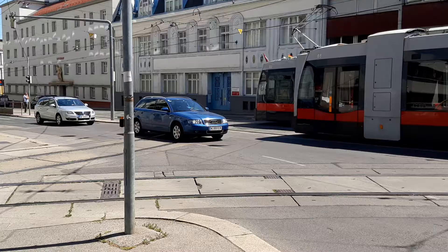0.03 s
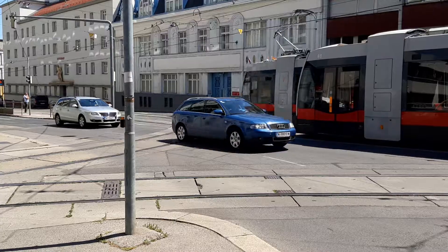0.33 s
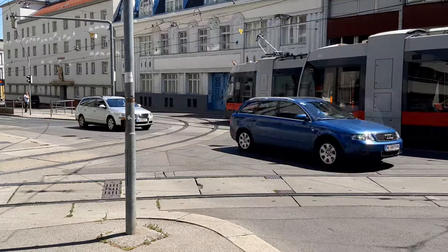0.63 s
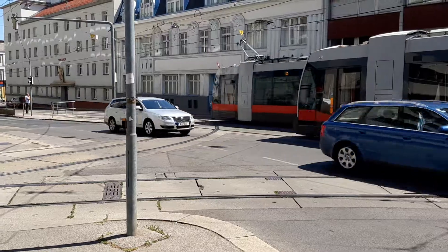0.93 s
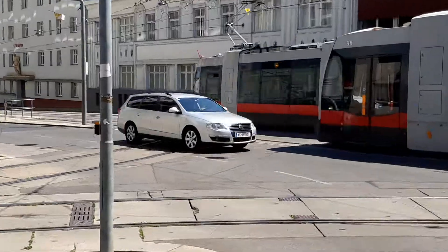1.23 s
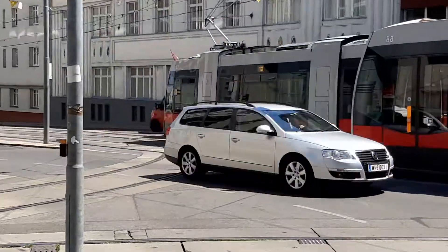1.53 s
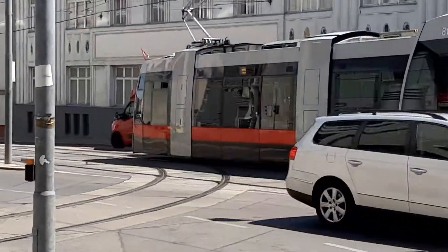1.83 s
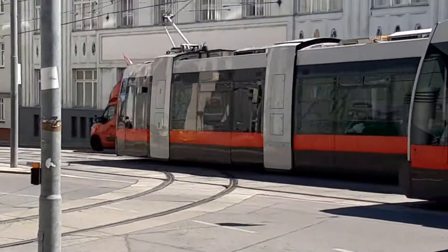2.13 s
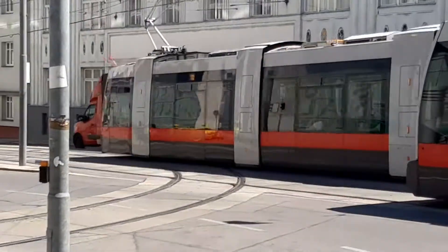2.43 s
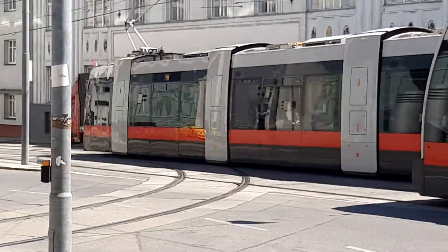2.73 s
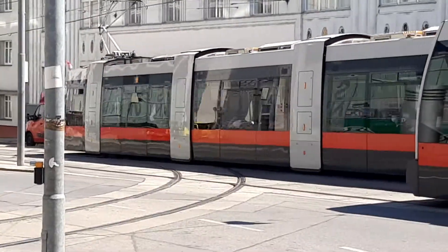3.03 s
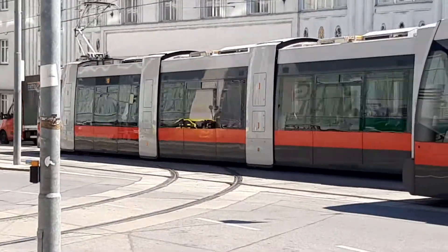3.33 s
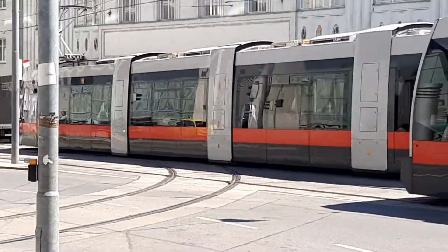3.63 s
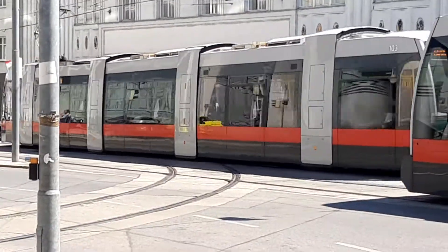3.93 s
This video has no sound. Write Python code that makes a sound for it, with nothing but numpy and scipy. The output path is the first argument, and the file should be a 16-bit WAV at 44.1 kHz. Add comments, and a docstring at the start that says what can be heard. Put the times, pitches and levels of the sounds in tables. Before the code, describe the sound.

A tram rolls through a curve at a city junction, its wheels ringing, knocking and thinly squealing. Two cars pass left to right early on, then the tram's electric whine swells and a short hiss follows, over low rumble.

```python
"""A tram rolls through a curve at a city junction: its steel wheels ring and knock over rail joints,
its electric drive whines and its flanges squeal thinly against the rail. Two cars pull past it,
left to right, engines humming, tyres roaring and slapping over the rail grooves. A short hiss spurts
near the end. House fronts scatter it all, over a wash of traffic, around two microphones a hand apart.
Underneath throbs a low rumble, probably wind buffeting the microphones."""
import sys
import numpy as np
from scipy import signal
from scipy.fft import rfft, irfft
from scipy.io import wavfile
from scipy.ndimage import uniform_filter1d, map_coordinates

SR = 44100
rng = np.random.default_rng(int(sys.argv[2]) if len(sys.argv) > 2 else 0)


def inscribe(sig):
    """Save sig as 16-bit PCM at rate SR to the path in sys.argv[1].

    A 1-D sig is mono; a 2-D sig holds one channel per row.
    Samples are clipped to [-1, 1] before scaling.
    """
    pcm = np.round(np.clip(np.atleast_2d(sig).T, -1, 1) * 32767)
    wavfile.write(sys.argv[1], SR, pcm.astype(np.int16))


N = 176400
MIC_SPACING_S = 0.00052  # sound's travel time between the microphones


def tram_wheels(bearing=0.76, rattle_db=1.0):
    """Steel wheels roll on the rail and set both ringing."""
    # rolling noise: freq_hz, gain_db
    rolling_spectrum = [(25, -30), (70, -0.5), (170, 5.5), (290, 2.5), (480, -2.5), (950, -3.5), (1250, -5),
                        (1600, -1.5), (2100, -7.5), (2800, -12.5), (3800, -13.5), (4600, -22), (7600, -29),
                        (8500, -43), (12000, -64), (15500, -50)]
    # its envelope: time_s, level_db
    rolling_level = [(.1, -30), (1.3, -31), (1.7, -28), (2.05, -27), (2.6, -30), (3.15, -29.5), (3.5, -31),
                     (4, -31.5)]
    # ring of wheels and rail: pitch_hz, width_hz, start_db, slope_db_per_s
    wheel_modes = [(1525, 43, -37.5, -4), (2050, 45, -41, -2.5), (2660, 210, -50.5, 1.1),
                   (3110, 140, -46.5, -4.5)]
    rolling = outdoors(colour(rolling_spectrum), bearing, echo_db=5.5)
    rolling *= undb(curve(rolling_level) + rattle_db * walk(35.25))
    ring = 0
    for hz, width, db, slope in wheel_modes:
        mode = outdoors(resonance(hz, width), bearing, echo_db=16.0)
        ring += mode * undb(db + slope * clock() + 0.66 * walk(12))
    return rolling + lean_right(ring, db=6)


def joint_knocks():
    """Tram wheels knock over rail joints: a dull thud, a clank and a longer ring of steel."""
    # wheel hits: start_s, thud_db, clank_db, ring_db
    hits = [(1.972, -23, -27, -34), (2.055, -24, -29, -37), (2.125, -23.5, -32, -29), (2.21, -26, -46, -50),
            (2.255, -26, -46, -50)]
    # low thud: freq_hz, gain_db
    thud_spectrum = [(25, -40), (50, -16), (110, 0), (180, -6), (350, -18), (1000, -19), (2500, -71)]
    # bright clank: freq_hz, gain_db
    clank_spectrum = [(200, -26), (700, 4.5), (2700, 0.5), (4000, -8), (7500, -12), (9000, -29),
                      (15000, -27)]
    # ring of a struck wheel: pitch_hz, gain_db
    steel_modes = [(1550, 1), (2040, 2), (2680, 2), (3830, -7), (4010, -10)]
    attack_s, knock_decay_s, ring_decay_s = 0.0066, 0.027, 0.045
    steel = sum(undb(db) * resonance(hz, width_hz=35) for hz, db in steel_modes)
    thud = outdoors(colour(thud_spectrum), bearing=0.56, echo_db=-8)
    clank = diffuse(colour(clank_spectrum))
    ring = diffuse(steel)
    out = 0
    for start, thud_db, clank_db, ring_db in hits:
        out += (thud * undb(thud_db) + clank * undb(clank_db)) * strike(start, attack_s, knock_decay_s)
        out += ring * undb(ring_db) * strike(start, attack_s, ring_decay_s)
    return out


def flange_squeals(edge_s=.08, scrape_depth=.8, stutter_db=2):
    """Wheel flanges rub the curved rail: a thin hiss with unsteady, very high squeals on top."""
    # envelope of the rub: time_s, level_db
    rub_level = [(.1, -60), (1.5, -64), (2.05, -54.5), (3.0, -61.5), (4, -62)]
    # squeals: start_s, length_s, pitch_hz, glide_hz, level_db, wander_hz
    squeals = [(.22, .32, 15100, -200, -60, 400), (1.6, .34, 11130, 200, -59, 40),
               (1.86, .4, 11130, 250, -57.5, 40), (2.26, .68, 11830, -70, -62, 45),
               (2.5, .23, 11810, -20, -54, 50), (3.06, 1.2, 11790, 0, -62.5, 35)]
    out = diffuse(resonance(hz=11740, width_hz=510)) * undb(curve(rub_level))
    for start, length, hz, glide, db, wander in squeals:
        age = clock() - start
        gate = np.clip(np.minimum(age, length - age) / min(edge_s, length / 2), 0, 1)
        pitch = hz + glide * np.clip(age / length, 0, 1) + wander * walk(200)
        squeal = np.array([tone(pitch) * (0.67 + scrape_depth * walk(350)) for _ in range(2)])
        out += squeal * gate * undb(db + stutter_db * walk(30.2))
    return out


def curve_strain(bearing=0.55, echo_db=8):
    """Strain in the curve makes resonances of the tram's wheels and body swell and die away."""
    # resonances, the wide ones scrapes: peak_s, spread_s, pitch_hz, width_hz, level_db
    modes = [(.2, .12, 156, 6, -30), (.22, .16, 4600, 70, -51), (.3, .13, 3780, 70, -42),
             (.62, .18, 3240, 180, -42), (1.335, .018, 3600, 1600, -40), (2.72, .12, 177, 6, -31)]
    return sum(outdoors(resonance(hz, width), bearing, echo_db) * undb(db) * swell(peak, spread)
               for peak, spread, hz, width, db in modes)


def drive_whine(waver_hz=2.43, fading_db=5.0):
    """The electric drive swells under load; echoes fade each partial separately at each microphone."""
    # whine partials: pitch_hz, level_db, load_change_db
    partials = [(1130, -53, 0), (1362.6, -53, -3), (1399, -54, 6.5), (1437.6, -58, 5), (1514.4, -51.5, 4),
                (2632, -61, 7), (2708, -62, 7)]
    load = swell(peak_s=3.3, spread_s=.3)
    out = 0
    for hz, db, load_change in partials:
        partial = place(tone(hz + waver_hz * walk(15)), bearing=0.31)
        fading = fading_db * np.array([walk(5.5), walk(5.83)])
        out += partial * undb(db + load_change * load + fading)
    return out


def car_engines(jitter=0.0039, flutter_db=2):
    """One car's exhaust boom and overtones climb as it speeds up; the other car drones."""
    # accelerating engine: time_s, firing_hz
    revs = [(.1, 75.7), (.45, 78.02), (1.1, 82.4), (2.9, 89.5)]
    # its envelopes: time_s, boom_db, overtones_db
    levels = [(.1, -27, -29.5), (.35, -21, -33), (.52, -21, -38), (.75, -34, -31.5), (1.12, -25.5, -29.5),
              (1.3, -34, -29.5), (1.5, -28.5, -39.5), (2.1, -31, -44.5), (2.8, -36, -40), (3.1, -29, -63)]
    # its overtones: firing_multiple, gain_db
    harmonics = [(2, -2.5), (3, -3.5)]
    # the other car's drone: time_s, pitch_hz, level_db
    drone_path = [(.1, 209, -36.5), (.5, 216, -34.5), (1.3, 215.6, -32.5), (1.7, 214, -34.5),
                  (2.1, 209, -66)]
    firing_hz = curve(revs) * (1 + jitter * walk(13.55))
    boom = tone(firing_hz) * undb(curve(levels) + 0.13 * walk(14.0))
    overtones = sum(tone(k * firing_hz) * undb(db + flutter_db * walk(11.2)) for k, db in harmonics)
    overtones *= undb(curve(levels, column=2))
    drone = tone(curve(drone_path) * (1 + 0.0081 * walk(22)))
    drone *= undb(curve(drone_path, column=2) + flutter_db * walk(11.0))
    left_to_right = np.tanh(0.73 * (clock() - .5))
    return place(boom + overtones + drone, left_to_right)


def car_passes(grain_db=1.2, right_offset_m=2.7):
    """Each car's tyre roar and body rumble sweep left to right and swell with nearness."""
    # cars at their closest: time_s, speed_m_per_s, distance_m, tyre_db, body_db
    cars = [(1.24, 7.3, 4.05, -30.5, -31), (2.0, 7.2, 2.73, -38.5, -27)]
    # tyre roar: freq_hz, gain_db
    tyre_spectrum = [(25, -26), (120, -3), (260, -0.5), (480, -12.5), (700, -6), (980, -1.5), (1300, -18.5),
                     (2000, -12.5), (3500, -28.5), (7500, -28.5), (8600, -43.5), (15000, -54)]
    # car body rumble: freq_hz, gain_db
    body_spectrum = [(30, -33), (80, -5.5), (130, -1.5), (180, -4.5), (300, -25.5), (900, -55.5)]
    out = 0
    for closest_s, speed, distance, tyre_db, body_db in cars:
        along = speed * (clock() - closest_s)
        across = along + right_offset_m  # the road comes closest right of centre
        bearing = across / np.hypot(across, distance)
        roar = outdoors(colour(tyre_spectrum), bearing, echo_db=-0.5)
        roar *= undb(tyre_db + grain_db * walk(70))
        body = outdoors(colour(body_spectrum), bearing, echo_db=-3.0) * undb(body_db)
        out += (roar + body) * distance / np.hypot(along, distance)
    return out


def tyre_slaps(bearing=0.74, attack_s=.001):
    """Car tyres slap over the rail grooves: short hollow tocks."""
    # slaps: start_s, pitch_hz, decay_s, level_db
    slaps = [(1.293, 800, .005, -16), (2.357, 1010, .012, -27)]
    tocks = sum(tone(np.full(N, hz)) * undb(db) * strike(start, attack_s, decay)
                for start, hz, decay, db in slaps)
    return place(tocks, bearing)


def hiss_spurt(level_db=-33.5):
    """A short, bright hiss, like an air valve."""
    # hiss: freq_hz, gain_db
    spectrum = [(300, -20), (800, 20), (3000, 8), (7500, 2), (8600, -13), (11500, 2), (13000, -14)]
    return diffuse(colour(spectrum)) * undb(level_db) * strike(3.835, attack_s=.012, decay_s=.08)


def low_rumble(throb_db=1.15):
    """A low, throbbing rumble, probably wind buffeting the microphones."""
    # low rumble: freq_hz, gain_db
    spectrum = [(20, -38), (32, -29), (48, 1), (60, 1.5), (74, 2.5), (92, -1.5), (125, -7.5), (190, -9),
                (320, -15), (700, -61)]
    # its envelope: time_s, level_db
    level = [(.1, -32), (1.45, -28.5), (2.0, -28.5), (2.14, -23), (2.29, -22.5), (2.45, -28), (2.8, -29.5),
             (2.9, -25), (3.25, -25), (3.42, -30.5), (3.78, -29), (3.89, -21.5), (4, -24)]
    rumble = outdoors(colour(spectrum), bearing=0.76, echo_db=4.5)
    return rumble * undb(curve(level) + throb_db * walk(24.99))


def street_wash():
    """A bed of traffic noise echoes between the house fronts."""
    # traffic bed: freq_hz, gain_db
    spectrum = [(25, -28), (100, -23), (250, 5.5), (480, -7), (750, -0.5), (1250, -12), (2000, -14.5),
                (3300, -13.5), (5000, -23), (7600, -24), (8500, -37.5), (12000, -29.5), (15500, -35.5)]
    # its envelope: time_s, level_db
    level = [(.1, -28.5), (.6, -31), (1.3, -30.5), (2.1, -41.5), (2.5, -43.5), (3.55, -47), (3.8, -38),
             (4, -35.5)]
    return outdoors(colour(spectrum), bearing=0.086, echo_db=7.5) * undb(curve(level) + .5 * walk(20))


def undb(db):
    """Decibels to gain."""
    return 10 ** (np.asarray(db) / 20)


def clock():
    """Time of every sample in seconds."""
    return np.arange(N) / SR


def curve(table, column=1):
    """One column of a table, joined by straight lines in time."""
    rows = np.array(table)
    return np.interp(clock(), rows[:, 0], rows[:, column])


def strike(start_s, attack_s, decay_s):
    """Envelope of a hit: quick rise, exponential decay."""
    age = np.maximum(clock() - start_s, 0)
    return np.minimum(age / attack_s, 1) * np.exp(-age / decay_s)


def swell(peak_s, spread_s):
    """A bell-shaped rise and fall."""
    return np.exp(-.5 * ((clock() - peak_s) / spread_s) ** 2)


def walk(rate_hz):
    """Smooth random motion with a spread near 1."""
    hold = max(int(SR / rate_hz), 2)
    steps = np.repeat(rng.standard_normal(N // hold + 2), hold)
    return 1.3 * uniform_filter1d(uniform_filter1d(steps, hold), hold)[:N]


def colour(points):
    """Gain at every frequency from (freq_hz, gain_db) points."""
    hz, db = np.array(points).T
    return undb(np.interp(np.log(np.fft.rfftfreq(N, 1 / SR) + 1), np.log(hz), db))


def resonance(hz, width_hz):
    """Gain at every frequency of one steep resonance."""
    return 1 / (1 + ((np.fft.rfftfreq(N, 1 / SR) - hz) / width_hz) ** 2)


def tone(hz):
    """A sine of rms 1 that follows a pitch curve."""
    return np.sqrt(2) * np.sin(2 * np.pi * (np.cumsum(hz) / SR + rng.random()))


def noise(gain):
    """Noise of the given colour with rms 1."""
    x = irfft(rfft(rng.standard_normal(N)) * gain, N)
    return x / x.std()


def diffuse(gain, bass_likeness=.72):
    """Noise from all sides: alike at both microphones in the bass only."""
    likeness = bass_likeness * np.sinc(2 * np.fft.rfftfreq(N, 1 / SR) * MIC_SPACING_S)
    mid, side = rfft(rng.standard_normal((2, N))) * gain * np.sqrt([1 + likeness, 1 - likeness])
    x = irfft(np.array([mid + side, mid - side]), N)
    return x / x.std()


def place(x, bearing):
    """Pan by delay, bearing -1 (left) to 1 (right): sound reaches the far microphone later."""
    lag = bearing * MIC_SPACING_S * SR / 2
    return np.array([map_coordinates(x, [np.arange(N) + shift], order=3, mode="mirror")
                     for shift in (-lag, lag)])


def lean_right(stereo, db):
    """Tilt the balance to the right by db."""
    return stereo * undb(np.array([[-db], [db]]) / 2)


def outdoors(gain, bearing, echo_db):
    """Noise from one direction plus a diffuse share, like scatter off house fronts."""
    echo = undb(echo_db)
    return (place(noise(gain), bearing) + echo * diffuse(gain)) / np.hypot(1, echo)


def scene():
    """The whole junction, a little louder on the right."""
    mix = car_engines() + car_passes() + street_wash()
    mix += tram_wheels() + low_rumble() + drive_whine() + flange_squeals()
    mix += joint_knocks() + hiss_spurt() + curve_strain() + tyre_slaps()
    return lean_right(mix, db=2.5)


def record(dry, start_s=.104, fade_s=.003, top_hz=15500):
    """The sound switches on abruptly and loses its very top."""
    gate = np.clip((clock() - start_s) / fade_s, 0, 1)
    lowpass = signal.ellip(10, .2, 80, top_hz, fs=SR, output="sos")
    return signal.sosfilt(lowpass, dry * gate)


dry = scene()
out = record(dry)
inscribe(out)
```